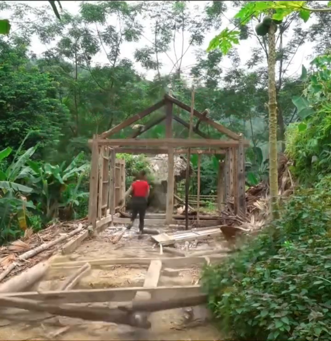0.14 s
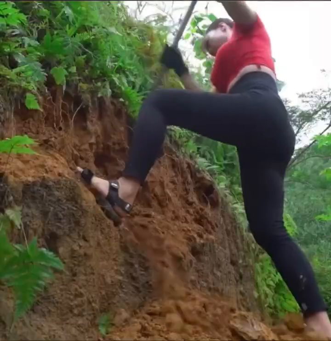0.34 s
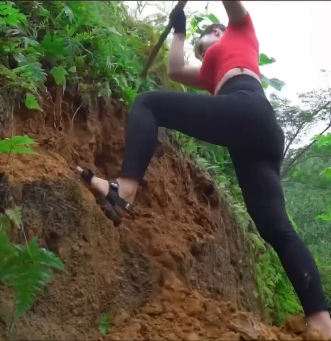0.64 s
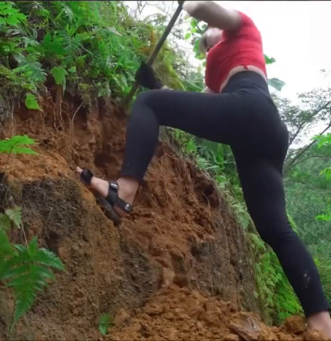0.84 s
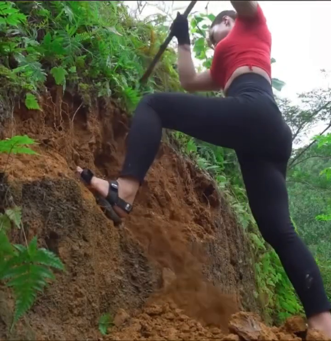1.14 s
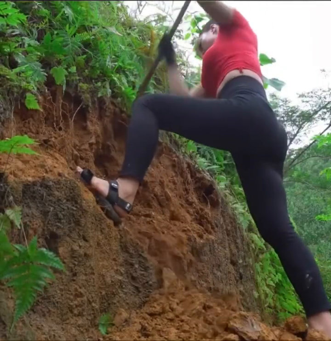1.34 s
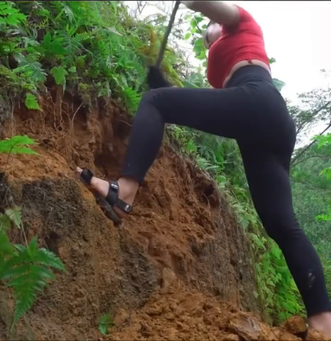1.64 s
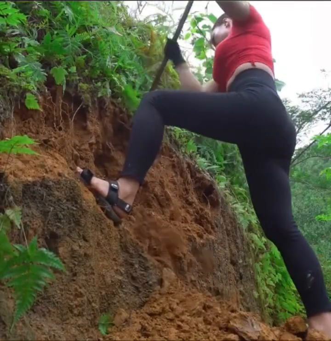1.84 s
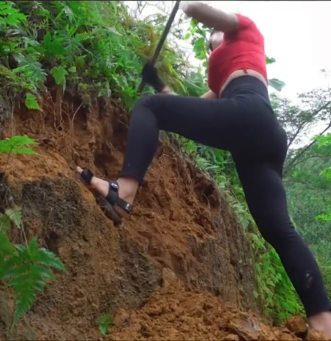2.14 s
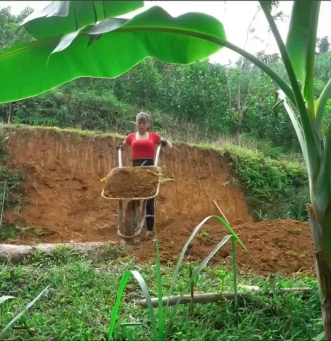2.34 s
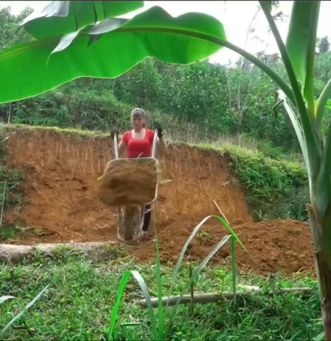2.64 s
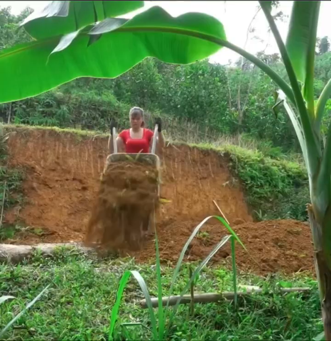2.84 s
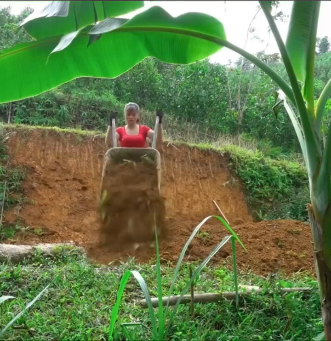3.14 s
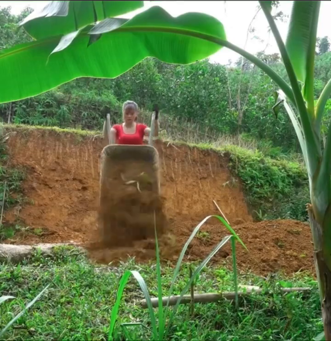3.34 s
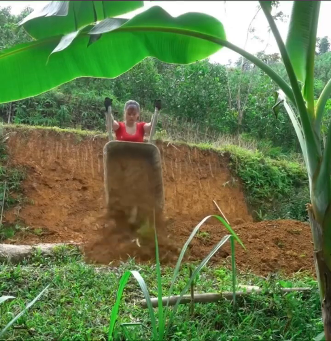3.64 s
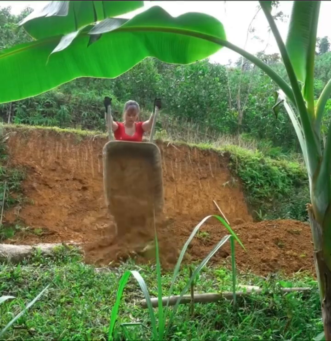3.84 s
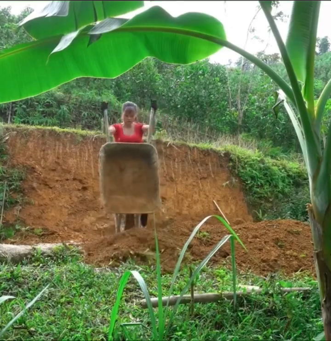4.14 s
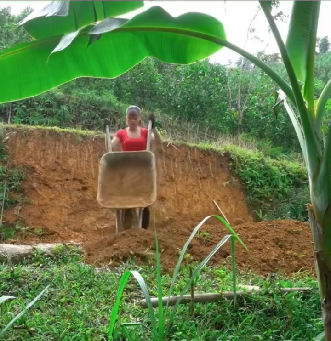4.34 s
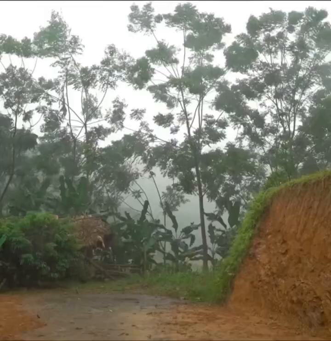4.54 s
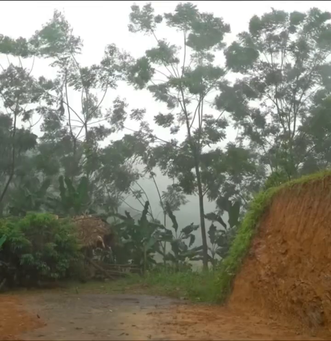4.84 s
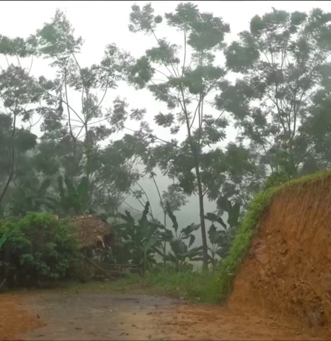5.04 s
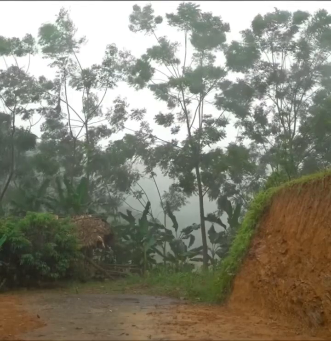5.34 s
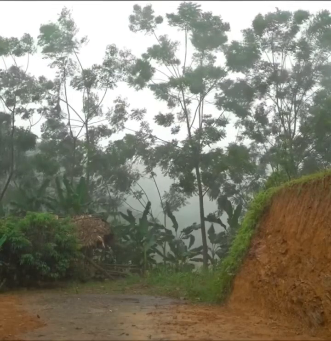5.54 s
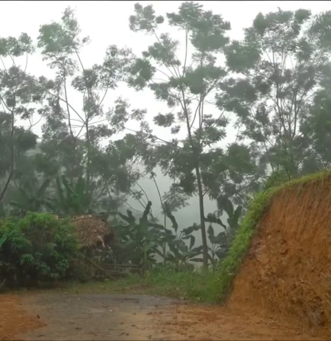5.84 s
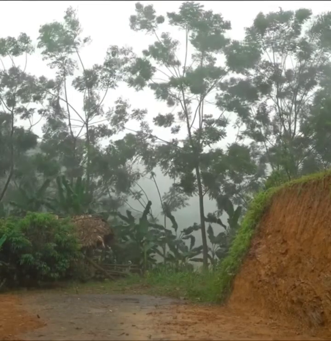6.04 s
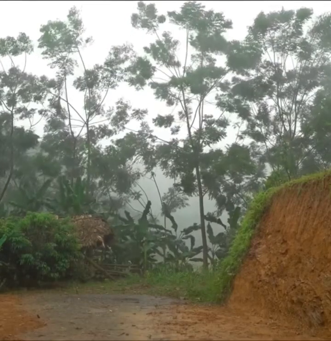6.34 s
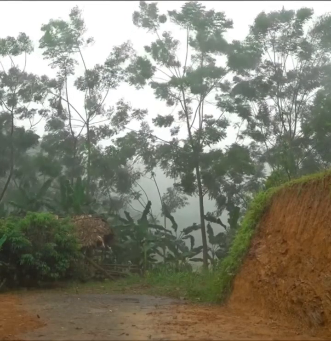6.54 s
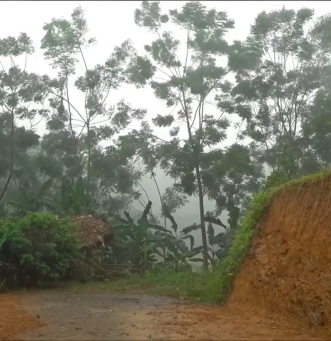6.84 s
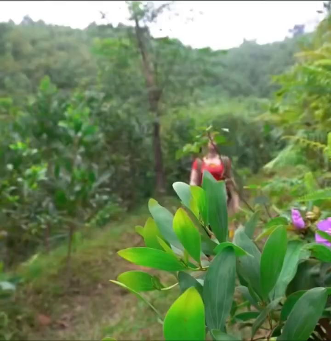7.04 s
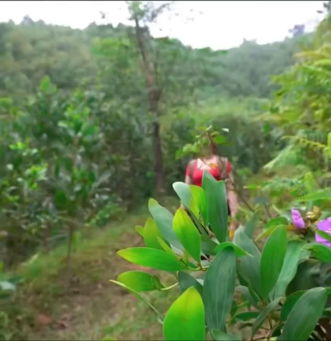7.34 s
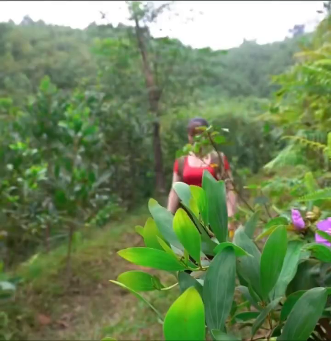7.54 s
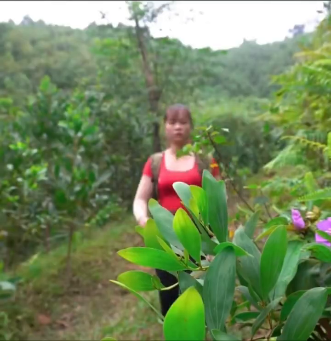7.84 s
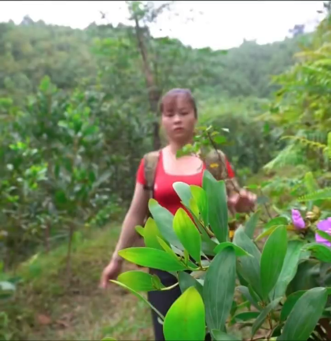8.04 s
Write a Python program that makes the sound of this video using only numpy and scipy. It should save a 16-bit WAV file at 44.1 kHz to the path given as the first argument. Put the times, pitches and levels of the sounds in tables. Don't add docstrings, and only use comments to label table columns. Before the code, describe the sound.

Outdoor montage with hard cuts, small camera microphone. A brief clatter of sliding planks, then close iron-bar blows into a clay bank with gritty cracks, trickling soil, cicadas and distant bird chirps. Soil then pours softly from a steel barrow that hums when bumped. Heavy rain bursts in, loud and steady, and cuts to a quiet path with clicking crickets and light footsteps at the end.

```python
import sys
import numpy as np
from scipy import signal
from scipy.fft import rfft, irfft, next_fast_len
from scipy.io import wavfile
from scipy.ndimage import uniform_filter1d, map_coordinates

SR = 44100
rng = np.random.default_rng(int(sys.argv[2]) if len(sys.argv) > 2 else 0)


def dump_mix(stems):
    frames = np.atleast_2d(stems).T
    limited = np.clip(frames, -1, 1)
    pcm = np.round(limited * 32767).astype(np.int16)
    wavfile.write(sys.argv[1], SR, pcm)


def ratio_of_db(decibels):
    return 10 ** (np.asarray(decibels, float) / 20)


N = 360738
TIME = np.arange(N) / SR


def unit(x):
    return x / np.sqrt(np.mean(x ** 2) + 1e-20)


def along(points, hz):
    f, v = np.transpose(points)
    return np.interp(np.log(hz + 1), np.log(f + 1), v)


def curves(rows):
    s, *cols = np.transpose(rows)
    return [np.interp(TIME, s, c) for c in cols]


def wobble(rate):
    knots = rng.standard_normal(int(N * rate / SR) + 4)
    return map_coordinates(knots, [np.arange(N) * rate / SR])


def during(start, end):
    return uniform_filter1d(1. * (TIME > start) * (TIME < end), size=400)


def lean(left_db):
    return ratio_of_db([[left_db], [-left_db]])


def filtered(x, response):
    m = next_fast_len(N + 8192)
    return irfft(rfft(x, m) * response(np.fft.rfftfreq(m, 1 / SR)), m)[..., :N]


def shaped(spectrum):
    return lambda hz: ratio_of_db(along(spectrum, hz))


def grains(rate, spread_db, share):
    hit = rng.random((2, N)) < rate / SR
    size = rng.exponential(1, (2, N))
    sign = np.sign(rng.standard_normal((2, N)))
    share = np.clip(share, 0, 1)
    impacts = unit(hit * ratio_of_db(spread_db * np.minimum(size, 3)) * sign)
    return np.sqrt(share) * impacts + np.sqrt(1 - share) * rng.standard_normal((2, N))


def patchy(x, patchy_db):
    z = signal.stft(x, nperseg=512)[2]
    field = uniform_filter1d(rng.standard_normal(z.shape[1:]), size=8, axis=0)
    field = uniform_filter1d(field, size=10, axis=1)
    return signal.istft(z * ratio_of_db(patchy_db * unit(field)), nperseg=512)[1][:, :N]


# (frequency [Hz], side minus mid level [dB])
WIDTHS = [
    [(60, -54), (220, -57), (830, -30), (3110, -9.5), (11600, 2.5)],
    [(60, -41), (220, -17), (830, -7.5), (3110, -2), (6500, -1), (8500, -1), (11600, -4)],
    [(60, -23), (220, -15), (830, -7), (2200, -5), (6500, -2.5), (11600, -2)],
    [(60, -41), (170, -64), (350, -30.5), (830, -11.5), (2000, -6.5), (4820, -2), (11600, -0.5)],
    [(60, -7), (350, -3), (2000, -2.5), (6500, -0.5), (8500, 0), (11600, -4)],
]


def stereo(pair, colour, width):
    mid, side = filtered(pair, lambda hz: colour(hz) * [hz >= 0, ratio_of_db(along(width, hz))])
    return np.array([mid + side, mid - side]) / np.sqrt(np.mean(mid ** 2) + 1e-20)


# (time [s], knocking level [dB], scrape level [dB])
TIMBER = [(0.0, -16, -17.5), (0.17, -20, -29), (0.21, -27.5, -22.5)]
# (frequency [Hz], width [Hz], level [dB])
WOOD = [(171, 126, 5), (720, 320, 5.5), (1350, 470, -0.5), (1867, 33, 0.5)]
# (frequency [Hz], level [dB per Hz])
SCRAPE = [(710, -11), (1200, -11), (1900, -9.5), (2050, -5.5), (4320, -7.5), (4660, -9.5), (7320, -13),
          (11400, -21), (14800, -62), (22000, -120)]
# (time [s], peak level [dB], bright peak level [dB])
SLAPS = [(0.003, -19, -30), (0.015, -22, -36), (0.047, -24, -49), (0.062, -21, -51), (0.115, -12, -28),
         (0.12, -5, -23.5), (0.135, -17, -19), (0.149, -11, -22), (0.154, -18, -22), (0.166, -16, -29),
         (0.179, -17, -25), (0.202, -19, -32)]
# (time [s], frequency [Hz], level [dB], decay t60 [s])
CLACKS = [
    (.014, 753, -14, .05),
    (.061, 1270, -12.5, 0.044),
    (.09, 646, -21, .07),
    (.16, 700, -24, .05),
]


def timber():
    def burst(s, t60):
        return (TIME > s) * ratio_of_db(-60 * np.abs(TIME - s) / t60)

    def wood(f):
        modes = ratio_of_db(-11) * (f < 150)
        for k, (centre, width, db) in enumerate(WOOD):
            damping = 1j * f * width
            modes = modes + (-1) ** k * ratio_of_db(db) * damping / (centre * centre - f * f + damping)
        return modes

    knock_db, scrape_db = curves(TIMBER)
    low, high = ratio_of_db(knock_db - 4.5), ratio_of_db(scrape_db - 6.0)
    for s, db, bright_db in SLAPS:
        low = low + ratio_of_db(db - 13.5) * burst(s, t60=0.07)
        high = high + ratio_of_db(bright_db - 1.5) * burst(s, t60=0.055)
    knocks = stereo(grains(400, spread_db=-3.5, share=0.28), wood, WIDTHS[0])
    scrape = stereo(grains(1500, spread_db=5.0, share=0.2), shaped(SCRAPE), WIDTHS[0])
    clacks = sum(ratio_of_db(db) * burst(s, t60) * np.sin(2 * np.pi * hz * (TIME - s))
                 for s, hz, db, t60 in CLACKS)
    return clacks + low * knocks + high * scrape


# (time [s], flow level [dB])
SOIL = [
    [(0.24, -48.5), (0.47, -53), (1.08, -53), (1.32, -50.5), (1.59, -52), (1.84, -53.5), (2.02, -51),
     (2.1, -50.5), (2.27, -51.5), (2.37, -54.5)],
    [(2.39, -53), (2.6, -54.5), (2.66, -50), (2.78, -50.5), (2.9, -49), (3.6, -49.5), (3.97, -55),
     (4.21, -57), (4.42, -54), (4.46, -45.5), (4.54, -56)],
]
# (frequency [Hz], level [dB per Hz])
CLODS = [
    [(15, -34), (25, 0), (167, -1), (381, 0), (498, -20), (663, 0.5), (924, -38), (1100, -5), (1430, -28),
     (2420, -120)],
    [(15, -41), (25, -6), (113, -6), (381, 0.5), (642, -7), (695, -25), (854, -14), (1100, -21),
     (1430, -55), (2420, -120)],
]
# (frequency [Hz], level [dB per Hz])
CRUMBS = [(350, -3), (600, -2.5), (693, -2.5), (869, 0.5), (1240, -3.5), (1560, -2.5), (5200, -7),
          (6760, -51), (11400, -120)]
CLOD_DB = (-2.5, -5.5)
CRUMB_DB = (-1, -2)
CLODS_GROW = (1.66, 0.69)
CLODS_LAG_S = (0, 0.22)
SETTLE_S, SETTLE_RISE_S, SETTLE_DB = 4.62, 0.12, 18
SCUFF_S, SCUFF_SPREAD_S, SCUFF_DB = 1.19, 0.042, 8.5


def soil(k):
    flow_db, = curves(SOIL[k])
    late_db, = curves(np.add(SOIL[k], (CLODS_LAG_S[k], 0)))
    middle_db = np.mean(SOIL[k], axis=0)[1]
    settle_db = SETTLE_DB * np.exp(-np.abs(TIME - SETTLE_S) / SETTLE_RISE_S)
    scuff_db = SCUFF_DB * np.exp(-((TIME - SCUFF_S) / SCUFF_SPREAD_S) ** 2)
    clods = stereo(patchy(grains(90, spread_db=3.5, share=0.3), 3.3), shaped(CLODS[k]), WIDTHS[k + 1])
    crumbs = stereo(patchy(grains(500, spread_db=4.5, share=0.1), 2.0), shaped(CRUMBS), WIDTHS[k + 1])
    clods_db = middle_db + CLODS_GROW[k] * (late_db - middle_db) + CLOD_DB[k] + settle_db
    return ratio_of_db(clods_db) * clods + ratio_of_db(flow_db + CRUMB_DB[k] + scuff_db) * crumbs


# (chorus level at the start [dB], drift [dB per s])
CICADAS = [
    (-52.5, 0.44),
    (-47.5, -1.1),
]
# (frequency [Hz], level [dB per Hz])
CHORUS = [
    [(2940, -48), (5000, -7), (5670, 0.5), (6620, 6), (7680, -1.5), (8400, -5.5), (10900, -41),
     (18500, -120)],
    [(3180, -40), (5400, -8.5), (5570, -8), (5960, -1), (6720, 3), (7960, -0.5), (8400, -4), (10900, -48),
     (18500, -120)],
]
# (time of a swell [s], rate [1/s], level over chorus [dB], depth [dB])
THROB = [
    (.93, 6.1, -11, 12),
    (2.4, 6.2, -15, 8.5),
]
# (lower level [dB], middle level [dB], upper level [dB])
TOP_NOISE_DB = [(-69.5, -58.5, -63.5), (-63, -61, -50.5)]
# (low edge [Hz], high edge [Hz])
EDGES = [
    (8400, 9150),
    (9150, 10150),
    (10150, 11370),
]
# (time [s], swell level [dB])
SHIMMER = [(.49, 3), (.72, 5.5), (.95, 3), (1.4, 4), (1.87, 1.5), (2.12, 6.5), (2.38, 4), (2.387, 12),
           (2.44, 9), (2.52, 7)]
DUCK_DB = [(0, 0, -4), (0, -16, -9)]
LEAN_DB = [0, 1.2, .1, 0, .5]


def cicadas(k):
    start_db, drift_db = CICADAS[k]
    chorus_db = start_db + drift_db * (TIME - SCENES[k + 1][0])
    at, rate, under_db, depth_db = THROB[k]
    throb_db = under_db + depth_db * np.cos(2 * np.pi * rate * (TIME - at))
    chorus = stereo(patchy(grains(1500, spread_db=17.0, share=.2), 1.26),
                    lambda hz: shaped(CHORUS[k])(hz) * (hz < EDGES[0][0]), WIDTHS[k + 1])
    lower_edge = shaped([(4300, -60), (4800, -10.0), (5800, 2), (6800, -11), (7600, -50)])
    throb = stereo(rng.standard_normal((2, N)), lower_edge, WIDTHS[k + 1])
    swell_db, = curves(SHIMMER)
    top = 0
    nominal_hz = (650, 400, 450)
    for db, duck_db, rows, (lo, hi), width in zip(TOP_NOISE_DB[k], DUCK_DB[k], WHISTLES, EDGES, nominal_hz):
        whistling = sum(during(*row[:2]) for row in rows)
        band = stereo(grains(2500, spread_db=6.0, share=0.16),
                      lambda hz: (hz > lo) & (hz < hi), WIDTHS[k + 1])
        top = top + ratio_of_db(db + swell_db + duck_db * whistling + 10 * np.log10((hi - lo) / width)) * band
    singers = ratio_of_db(chorus_db + 2.0) * chorus + ratio_of_db(chorus_db + throb_db) * throb
    return singers * lean(LEAN_DB[k + 1]) + top


# (time [s], length [s], from [Hz], to [Hz], level [dB])
CHIRPS = [(0.272, 0.034, 4100, 3580, -58), (0.556, 0.044, 4300, 3800, -54), (.66, 0.028, 4700, 4470, -53),
          (0.832, 0.034, 4500, 3860, -53), (1.648, 0.035, 4200, 4100, -51), (2.238, .014, 4200, 4050, -43),
          (2.278, .04, 4050, 4000, -57), (2.328, 0.053, 4300, 4230, -53)]


def bird():
    out = np.zeros(N)
    for s, length, from_hz, to_hz, db in CHIRPS:
        u = np.clip((TIME - s) / length, 0, 1)
        cycles = length * u * (from_hz + (to_hz - from_hz) * u / 2)
        out += ratio_of_db(db) * np.sin(np.pi * u) * np.sin(2 * np.pi * cycles)
    return out * (0.92 + 0.5 * wobble(300))


# (time [s], frequency [Hz], level [dB], decay t60 [s])
TUB = [(2.203, 374, -34, 0.11), (3.298, 405, -32, .08), (3.4, 119, -50, .4), (3.531, 121, -52, 0.33),
       (3.472, 450, -44, 0.18), (3.665, 121, -43, 0.22), (3.68, 195, -40.5, 0.34), (3.74, 199, -44, 0.29),
       (4.235, 370, -49, .15), (4.275, 338, -46, .15), (4.335, 450, -49.5, 0.24), (4.35, 325, -51, .2),
       (4.411, 343, -47.5, .15), (4.442, 449, -37, 0.36), (4.445, 850, -48, 0.1), (4.465, 800, -52, 0.084),
       (4.497, 930, -47, .08), (4.478, 197, -31, 0.093), (4.52, 203, -38, 0.2), (4.51, 423, -50, 0.18)]
# (time [s], frequency [Hz], level [dB], decay t60 [s])
TINGS = [(.32, 2660, -40, .05), (.711, 2650, -42, .05), (.755, 4100, -40, 0.055), (.777, 2590, -36, 0.045),
         (.779, 4100, -36, 0.044), (.777, 950, -34, .04), (1.4695, 1880, -16, 0.025),
         (1.863, 2900, -26, 0.027), (1.93, 4240, -31, 0.035), (2.241, 4100, -40, .04),
         (1.203, 1480, -31, 0.032), (1.863, 4000, -35, .03), (2.203, 785, -36.5, .06),
         (2.627, 2170, -36, .04), (2.628, 3380, -34, 0.049), (3.08, 890, -47, 0.065),
         (1.863, 920, -29, 0.038)]


def tub():
    def ringing(rows, rise_s):
        out, t = np.zeros(N + SR), np.arange(SR // 2) / SR
        for s, hz, db, t60 in rows:
            envelope = ratio_of_db(db - 60 * t / t60) * (1 - np.exp(-t / rise_s))
            out[round(s * SR):][:len(t)] += envelope * np.sin(2 * np.pi * hz * t)
        return out[:N]

    hum = ringing(TUB, rise_s=0.0038)
    return hum * (1.0 + 0.37 * wobble(120)) + ringing(TINGS, rise_s=0.002)


# (time [s], thud peak level [dB], thud [Hz], crack level [dB], level of its top end [dB])
TAPS = [(0.322, -45, 242, -40, -2), (0.757, -45, 300, -37, -4), (.824, -39, 800, -43, -6),
        (1.096, -48, 300, -45, 0), (1.13, -28.5, 315, -52, 0), (1.147, -34, 318, -39, 0),
        (1.162, -50, 330, -41, 9), (1.1855, -36, 354, -34, 11), (1.203, -35, 342, -32, -2),
        (1.323, -36.5, 302, -53, 0), (1.4, -30, 604, -45, 0), (1.844, -30.5, 615, -38, -8),
        (1.93, -45, 630, -33, -1), (1.934, -52, 630, -31, -1), (1.943, -55, 630, -41, -2),
        (2.053, -49, 400, -39, 1), (2.07, -41, 253, -36, 2), (2.093, -52, 400, -39, -2),
        (2.468, -38, 475, -56, 0), (2.619, -60, 400, -41, -10), (2.629, -54, 400, -28, 3),
        (2.714, -61, 501, -39, -8), (2.741, -54, 450, -45, -8), (2.927, -36, 425, -58.5, 0),
        (2.966, -39, 360, -50, -5), (2.975, -42, 450, -55, 0), (3.045, -41, 330, -53, 0),
        (3.604, -60, 500, -46, -8), (4.081, -43.5, 398, -62, -2), (4.454, -51, 800, -38, -6),
        (7.55, -54, 370, -62, 0), (7.78, -51, 380, -58, 0), (7.831, -58, 594, -47, 0),
        (8.048, -38.5, 400, -29, -7.5), (8.115, -52, 400, -45, -3), (8.133, -53, 415, -34, -3),
        (8.174, -44, 293, -32, -6)]
MORE_TAPS = [(1.118, -34, 300, -59, 0), (1.232, -40, 300, -44, -3), (1.243, -43, 250, -50, 0),
             (2.385, -60, 400, -47, 10), (2.411, -60, 400, -48, 12), (3.09, -42, 420, -52, -5),
             (3.25, -40, 430, -60, 0), (4.295, -45, 600, -55, -6), (4.395, -46, 400, -60, 0),
             (7.741, -60, 500, -46, 0), (7.759, -53, 700, -38.5, -1)]
# (time [s], thud peak level [dB], thud [Hz], crack level [dB], boom level [dB])
STRIKES = [
    (0.749, -29, 166, -44, -33),
    (0.7794, -17, 312, -30, -33),
    (1.4698, -13, 385, -15, -26.5),
    (1.8645, -32, 302, -24, -46),
    (2.201, -26.5, 178, -33, -35),
    (2.242, -31, 202, -35, -40),
    (3.3, -30, 270, -49, -37),
    (4.442, -33, 203, -39, -52),
]
STRIKE_TOP_DB = [0, 3, 0, -12, 1, -3, 0, -5]
# (frequency [Hz], level [dB], decay t60 [s])
IRON = [(800, 17, 0.013), (1950, -6, 0.019), (2660, -6, 0.1), (3380, -2, .03), (4100, 4, 0.024),
        (7670, 3, 0.031)]
# (frequency [Hz], level [dB per Hz])
GRIT = [(650, -37), (1100, -6), (1860, -5), (2890, -1.5), (3650, -2), (4650, -6.5), (7650, -6), (11300, -5),
        (14700, -40), (22000, -120)]
# (frequency [Hz], level [dB per Hz])
PUFF = [(40, -22), (150, -2), (500, -11.5), (800, -17.5), (2000, -41)]
PUFF_DB, PUFF_T60_S = -6, 0.075
TAP_BOOM_DB = -31
RING_DB, RING_GROWS = 4.5, 1.89
KNOCK_CYCLES = 18
BOOM_WANDER_HZ = 45
SPLIT_HZ = 5500


def blows():
    low, high = np.zeros(N + SR), np.zeros((4, N + SR))
    t = np.arange(SR // 5) / SR
    hits = [(*row, top_db) for row, top_db in zip(STRIKES, STRIKE_TOP_DB)]
    for s, db, hz, crack_db, top_db in TAPS + MORE_TAPS:
        hits.append((s, db, hz, crack_db, db + TAP_BOOM_DB, top_db))
    for s, db, hz, crack_db, boom_db, top_db in hits:
        luck, near = rng.standard_normal(len(IRON)), rng.uniform(-1.66, 1, 5)
        here = slice(round(s * SR), round(s * SR) + len(t))

        body = sum(np.sin(2 * np.pi * hz * 2 ** (0.45 * u) * t) for u in near)
        knock = ratio_of_db(db - 2.5 - 60 * t * hz / KNOCK_CYCLES) * (1 - np.exp(-t / 0.0013))
        knock = knock * (np.sin(2 * np.pi * hz * t) + 0.12 * body)

        crumbs = np.repeat(rng.standard_normal(len(t) // 128 + 1), repeats=128)[:len(t)]
        cycles = 72 * t + 120 * 0.0272 * (1 - np.exp(-t / 0.0317)) + BOOM_WANDER_HZ * np.cumsum(crumbs) / SR
        shake_db = 6.4 * np.sin(2 * np.pi * 31 * t + 3 * near[0])
        boom = ratio_of_db(boom_db + 0.5 + shake_db - 60 * t / 0.24) * (1 - np.exp(-t / 0.0027))
        boom = boom * np.sin(2 * np.pi * cycles)

        ring_db = RING_DB + RING_GROWS * crack_db - 5.0
        ring = sum(ratio_of_db(ring_db + level + 3.4 * g - 60 * t / life) * np.sin(2 * np.pi * f * t)
                   for (f, level, life), g in zip(IRON, luck))
        low[here] += knock + boom + ring

        snap = (1 - np.exp(-t / .0004)) * ratio_of_db(-60 * t / .021)
        falling_grit = .2 * ratio_of_db(-60 * t / .15 + 2 * np.clip(crumbs, -3, 1))
        fade = snap + falling_grit
        puff = ratio_of_db(db + PUFF_DB - 60 * t / PUFF_T60_S) * (1 - np.exp(-t / 0.0032))
        crack, crack_top = ratio_of_db(crack_db - 3.0) * fade, ratio_of_db(crack_db - 1.0 + top_db) * fade
        high[:, here] += np.array([crack, crack, puff, crack_top]) * rng.standard_normal((4, len(t)))

    def colour(x, spectrum):
        gain = shaped(spectrum)
        return filtered(x, gain) / np.sqrt(np.mean(gain(np.linspace(0, SR / 2, num=999)) ** 2))

    mid, side, top = colour(high[[0, 1, 3], :N], GRIT)
    mid = top + filtered(mid - top, lambda f: 1 / (1 + (f / SPLIT_HZ) ** 6))
    thuds = filtered(low[:N], lambda f: f * f / (f * f + 40 ** 2))
    return thuds + colour(high[2, :N], PUFF) + mid + 0.057 * side * [[1], [-1]]


# (from [s], to [s], first level [dB], last level [dB])
WHISTLES = [
    [(2.42, 3.75, -67, -73), (3.81, 3.98, -79, -82), (4.2, 4.75, -81, -57)],
    [(3.33, 3.65, -54, -58), (3.66, 4.6, -57, -58)],
    [(1.5, 2.38, -58, -61), (2.386, 2.63, -40.5, -44), (4.43, 4.56, -36.5, -51), (4.56, 4.75, -40, -70)],
]
PITCHES = [8775, 9737, 10697]
RIGHT_DB = (0, .8, 0)
BLIPS = (3.295, 3.635, 4.44)
BLIP_S, BLIP_DB = 0.029, -42.5
LEFT_LAG = 1.0


def whistles():
    levels = []
    for rows in WHISTLES:
        level = sum(during(a, b) * ratio_of_db(np.interp(TIME, (a, b), (first_db, last_db)))
                    for a, b, first_db, last_db in rows)
        levels.append(ratio_of_db(4.7 * wobble(22.05)) * level)
    levels[1] = levels[1] + ratio_of_db(BLIP_DB) * sum(during(s, s + BLIP_S) for s in BLIPS)
    phase = LEFT_LAG * np.array([[-.5], [.5]])
    return sum(level * np.sqrt(2) * np.sin(2 * np.pi * hz * TIME + phase) * lean(-db)
               for level, hz, db in zip(levels, PITCHES, RIGHT_DB))


# (time [s], fall level [dB])
RAIN = [(4.54, -54), (4.557, -31), (4.563, -18), (4.66, -19), (4.8, -17.5), (4.95, -20.5), (5.14, -20),
        (5.35, -19.5), (5.6, -18.5), (5.9, -18.5), (6.09, -18), (6.14, -18.5), (6.21, -18), (6.255, -19.5),
        (6.31, -18), (6.895, -18.5), (6.91, -32.5)]
# (time [s], level [dB])
GUSTS = [(4.6, -1), (4.95, 2), (5.08, 1.5), (5.23, 2.5), (5.31, 0), (5.62, 1), (5.72, -1), (5.98, 1),
         (6.07, -2), (6.1, 1.5), (6.145, -4.5), (6.21, 0), (6.255, 0), (6.31, -.5), (6.89, 0)]
# (frequency [Hz], level [dB per Hz])
DRUM = [(13, -45), (22, -21.5), (96, -8), (180, -6.5), (210, -1.5), (246, -5.5), (308, -2.5), (470, -1),
        (563, -3), (615, -2), (1320, -4.5), (3760, -16), (4600, -21.5), (5980, -88), (10100, -120)]
SPRAY = [(2710, -16), (4600, 0), (9610, -5.5), (10900, -6.5), (11200, -9), (14600, -43), (22000, -120)]
SPRAY_DB, SPRAY_GROWS = -32.5, 0.41
PUDDLE_DB, FILL_DB_PER_S = -20.5, 3.5
GUST_DB, FLURRY_DB = 0.6, 0.63


def rain():
    drum_db, = curves(RAIN)
    spray_db = SPRAY_DB + SPRAY_GROWS * (drum_db + 18.5)
    gust_db = curves(GUSTS)[0] + GUST_DB * wobble(9) / 2 + FLURRY_DB * wobble(40)
    drum = stereo(patchy(grains(2200, spread_db=3.2, share=.4), 1.0), shaped(DRUM), WIDTHS[3])
    puddle = stereo(grains(500, spread_db=2.0, share=0.4),
                    lambda f: f * 330 / (760 ** 2 - f * f + 1j * f * 330), WIDTHS[3])
    spray = stereo(patchy(grains(2500, spread_db=4.0, share=0.22), 1.35), shaped(SPRAY), WIDTHS[3])
    puddle_share = ratio_of_db(PUDDLE_DB + FILL_DB_PER_S * (TIME - RAIN[0][0]))
    ground = ratio_of_db(drum_db + 0.35 + gust_db / 2) * (drum + puddle_share * puddle)
    return ground + ratio_of_db(spray_db + gust_db) * spray


PATH_DB = (-47.5, -50, -58.5, -57)
NEAR_DB = (0.68, .4, 7.6, 1.6)
# (frequency [Hz], level [dB per Hz])
LOW_CRICKET = [(1410, -55), (2400, -23), (2950, -8.5), (3170, -3), (3300, 3.5), (3520, -3.5), (3880, -7),
               (4070, -14), (4300, -17), (5590, -58), (9460, -120)]
HIGH_CRICKET = [(2620, -53), (4450, -20), (4810, 1.5), (5280, 7), (5620, -4), (5750, -34), (7480, -49),
                (12700, -120)]
RUSTLE = [(15, -53), (25, -23), (96, -3.5), (140, -4), (220, -10), (360, -1.5), (498, -6), (667, -3),
          (984, -8), (1370, -6.5), (2600, -10), (3380, -31), (5720, -120)]
HISS = [(3470, -50), (5900, -9), (6160, -11), (7200, -4), (8110, -9), (8200, -13), (8380, -15), (8780, -6),
        (9500, -5), (10200, 1), (10800, 0.5), (11300, -24), (14700, -54), (22000, -120)]
NEAR_S, NEARING_S = 8.14, 0.13


def path():
    # (colour, impacts a second, their share, patchiness [dB])
    layers = [(LOW_CRICKET, 1500, .15, 0.72), (HIGH_CRICKET, 2000, .15, .66),
              (RUSTLE, 200, .2, 1.9), (HISS, 900, .1, 1.2)]
    near = np.exp(-np.abs(TIME - NEAR_S) / NEARING_S)
    out = 0
    for db, near_db, (colour, rate, share, patchy_db) in zip(PATH_DB, NEAR_DB, layers):
        clicks = patchy(grains(rate, spread_db=4.0, share=share), patchy_db)
        out = out + ratio_of_db(db + near_db * near) * stereo(clicks, shaped(colour), WIDTHS[4])
    return out


# (from [s], to [s], low edge [Hz], high edge [Hz], share of the time)
GAPS = [(2.42, 4.54, 8420, 9120, 1), (2.26, 2.32, 10200, 11500, 1), (2.52, 2.62, 10300, 11500, 1),
        (4.45, 4.53, 10150, 11500, 1), (3.36, 3.6, 9120, 9950, 1), (3.67, 4.53, 9120, 9950, .4),
        (6.97, 7.99, 8000, 8400, 1), (6.96, 7.14, 5850, 6150, .5), (7.14, 7.67, 5680, 6330, 1),
        (7.79, 7.92, 5680, 6300, 1), (7.965, 8.04, 5720, 6280, 1), (7.1, 7.66, 4150, 4540, 1),
        (7.73, 7.8, 4330, 4480, 1), (7.91, 8.0, 4300, 4450, 1), (4.87, 4.92, 4330, 4520, 1),
        (4.87, 4.91, 8150, 8330, 1), (4.865, 4.925, 11150, 11500, 1), (2.49, 2.53, 10950, 11500, 1),
        (7.61, 7.68, 170, 300, 1), (7.1, 7.97, 10920, 11500, .9)]
# (from [s], to [s], above [Hz], side level [dB])
CENTRED = [
    (.3, .68, 8400, -6),
    (.68, 1.5, 8400, -16),
    (1.5, 2.2, 8400, -2),
    (2.2, 2.38, 8400, -12),
]
TOP_HZ = 11360
RAGGED_HZ = 70
COMB_HZ, COMB_RAD, COMB_SHARE = 481, 1.1, .5


def thinned(x):
    hz, t, (mid, side) = signal.stft([x[0] + x[1], x[0] - x[1]], SR, nperseg=1024)
    rows = hz[:, None]
    keep = (rows < TOP_HZ) * (t >= 0)
    drift = wobble(13)
    for start, end, lo, hi, share in GAPS:
        need = np.interp((t + lo) % (N / SR), TIME, drift)
        inside = (t > start) & (t < end)
        band = (rows > lo + RAGGED_HZ * need) & (rows < hi - RAGGED_HZ * need)
        keep = keep * ~(band & inside & (need <= np.quantile(need[inside], share)))
    swing = -COMB_RAD * np.cos(2 * np.pi * (rows - PITCHES[0]) / COMB_HZ)
    swung = np.sqrt(1 - COMB_SHARE) * side + 1j * np.tan(swing / 2) * mid
    side = np.where(rows > EDGES[0][0], swung, side)
    for start, end, lo, db in CENTRED:
        side = side * ratio_of_db(db * ((rows > lo) & (t > start) & (t < end)))
    return signal.istft(np.array([mid + side, mid - side]) / 2 * keep, SR, nperseg=1024)[1][:, :N]


# (start [s], fade-in [s], end [s], fade-out [s])
SCENES = [
    (-.1, .01, .232, .035),
    (.2, .03, 2.385, .03),
    (2.368, .016, 4.565, .03),
    (4.536, .02, 6.925, .03),
    (6.9, .03, 8.3, .01),
]


def scene():
    sounds = [timber(), soil(0) + cicadas(0), soil(1) + cicadas(1), rain(), path() * lean(LEAN_DB[4])]
    joined = 0
    for x, (start, rise, end, fall) in zip(sounds, SCENES):
        joined = joined + x * np.clip((TIME - start) / rise, 0, 1) * np.clip((end - TIME) / fall, 0, 1)
    return joined + bird() + tub() + blows()


def low_pass(x):
    return signal.sosfilt(signal.butter(12, 11620, fs=SR, output="sos"), x)


def record(dry):
    mix = thinned(dry) + whistles()
    return low_pass(mix)


dry = scene()
out = record(dry)
dump_mix(out)
```